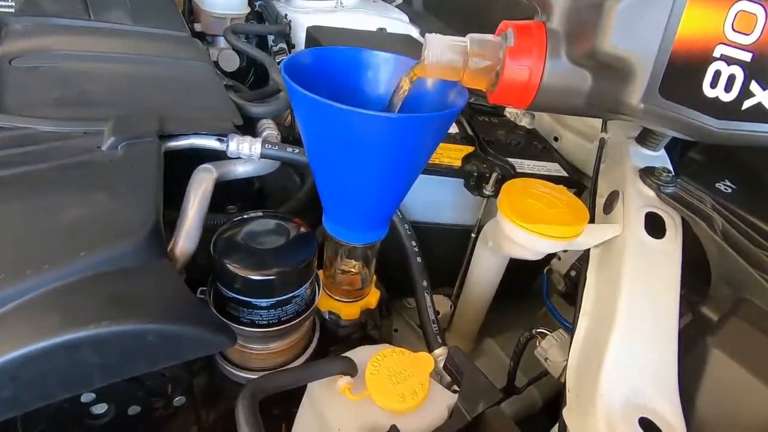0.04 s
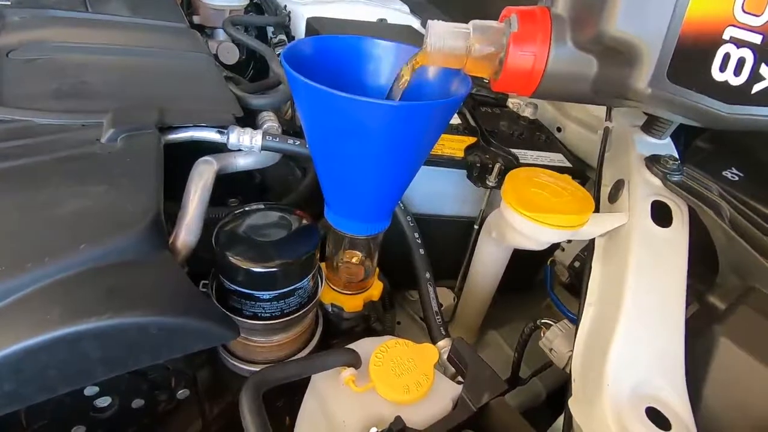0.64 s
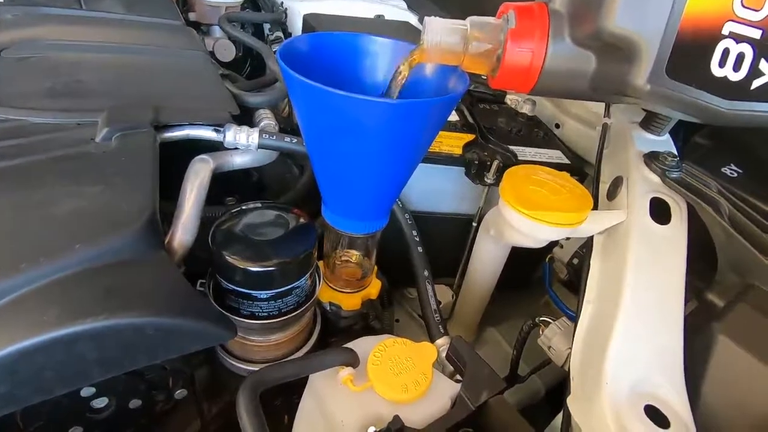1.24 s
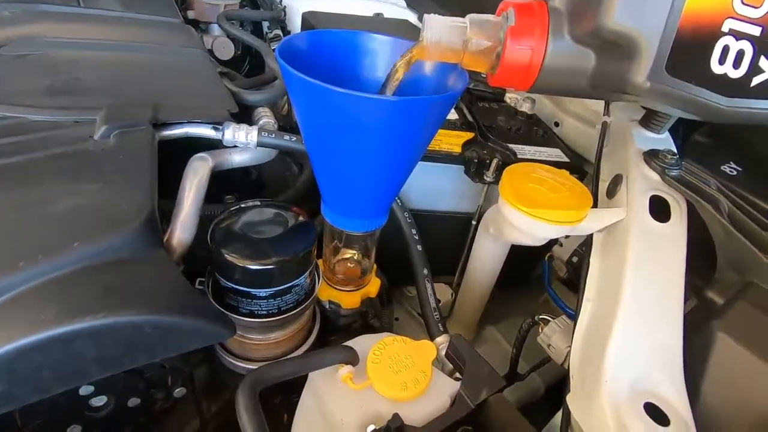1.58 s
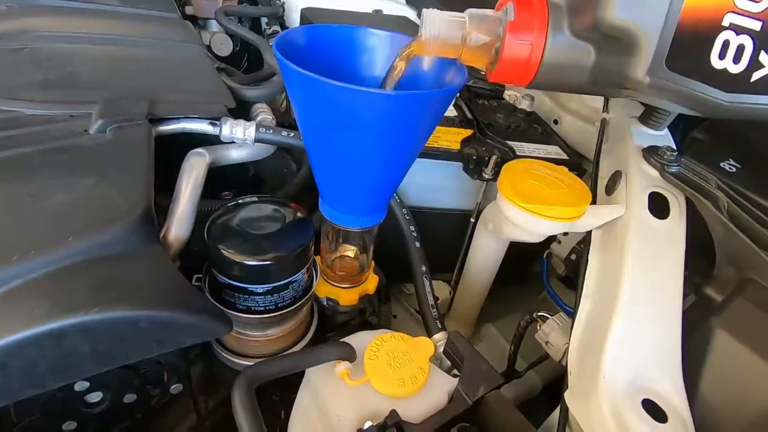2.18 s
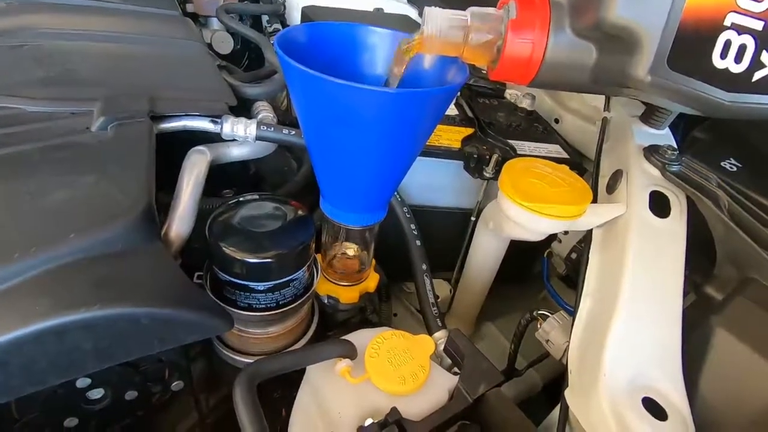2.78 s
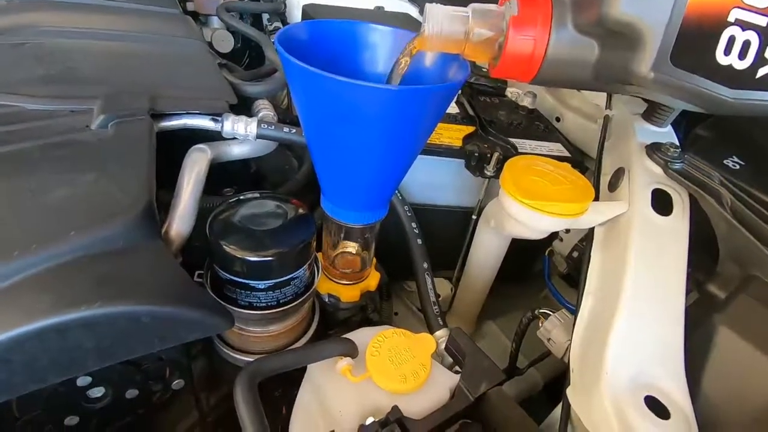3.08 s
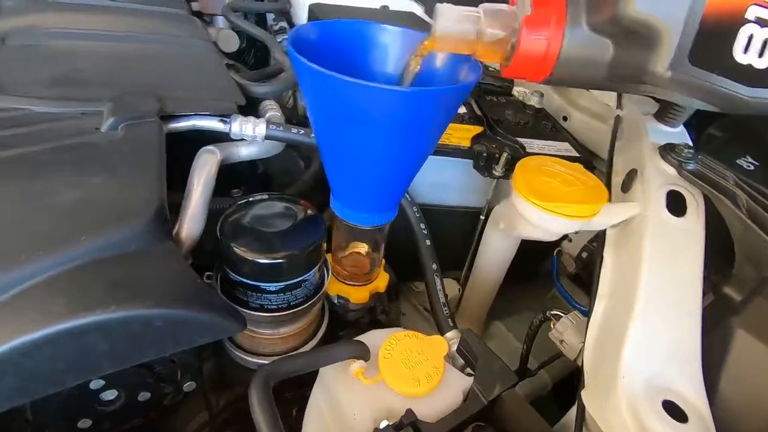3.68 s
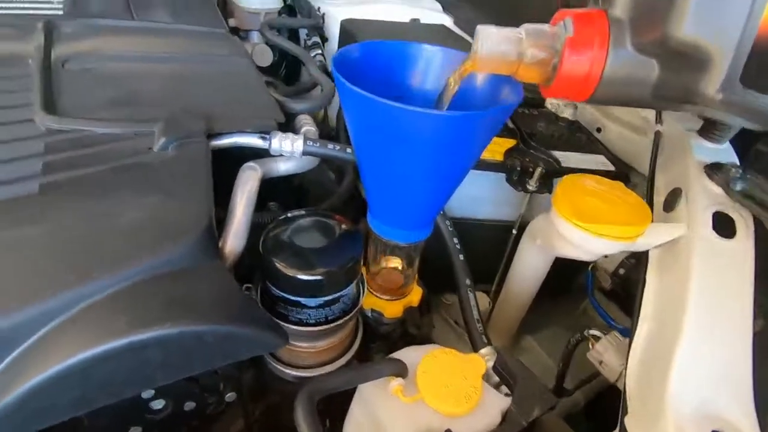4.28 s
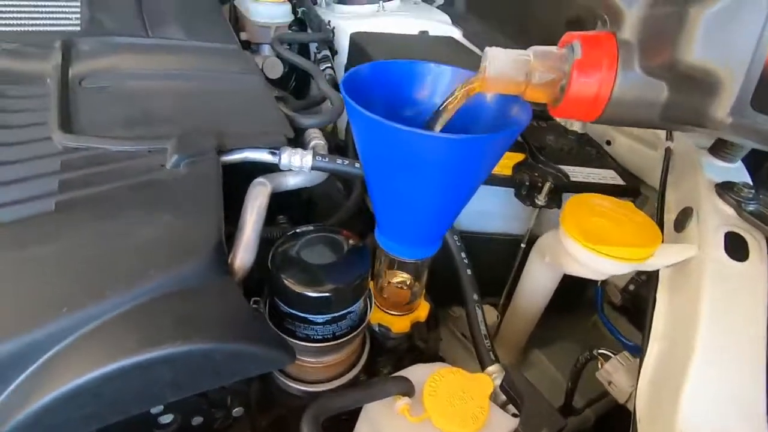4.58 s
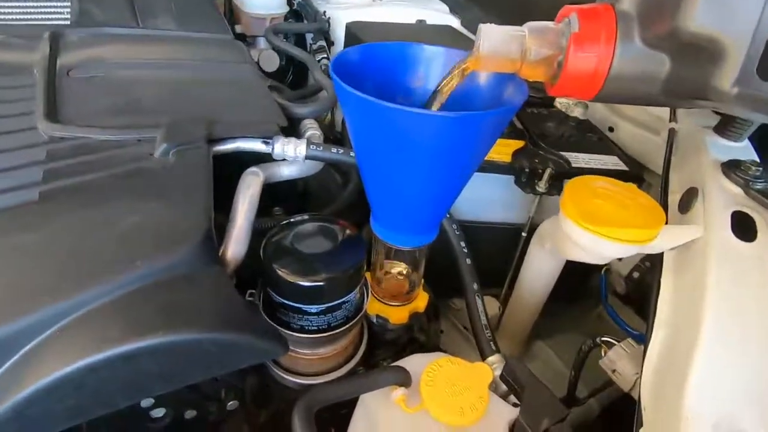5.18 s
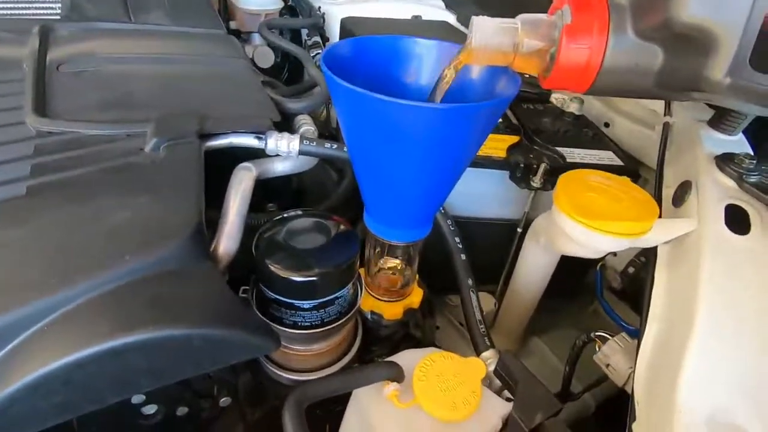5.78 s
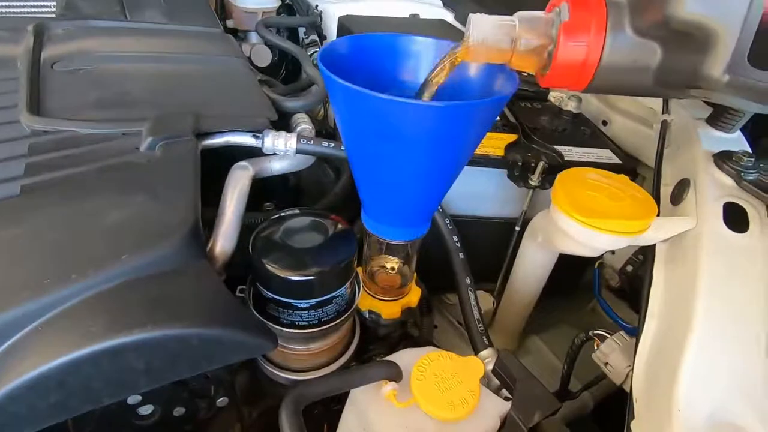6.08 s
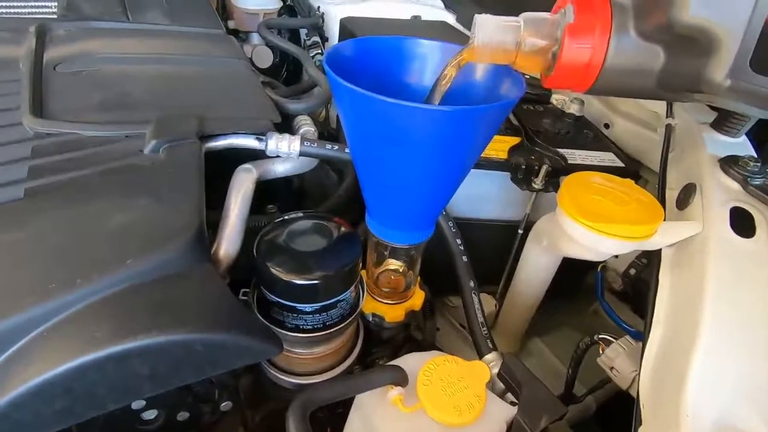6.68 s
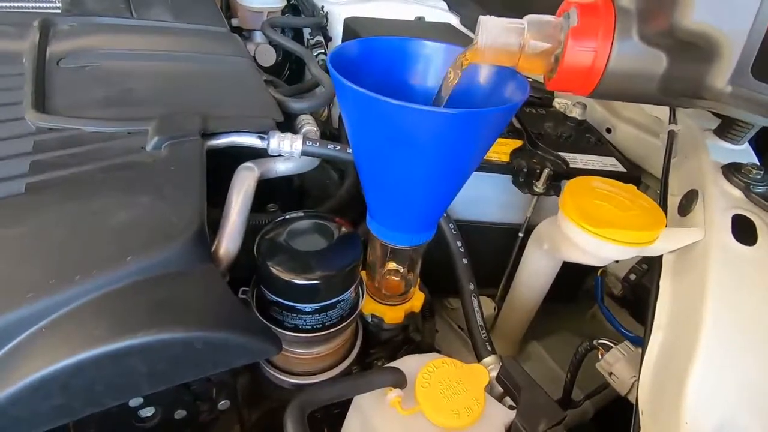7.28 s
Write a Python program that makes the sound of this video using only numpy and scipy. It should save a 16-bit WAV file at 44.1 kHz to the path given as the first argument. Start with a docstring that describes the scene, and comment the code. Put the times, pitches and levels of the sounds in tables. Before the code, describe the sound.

Close, rounded glugs repeat throughout as air gulps into a plastic bottle of oil being emptied into a funnel. Small bubble pops and light plastic clicks fall between them. About halfway there is one sharp knock on the microphone, then a quick rustle of cloth. The garage adds a slight echo, with a quiet humming fan, soft hiss and very faint insects chirping far away.

```python
"""Glug, glug: engine oil pours from a plastic bottle into a funnel, over an engine bay in a garage. About twice
a second air breaks in through the neck with a gulp, and some 80 ms later the bubble plops loose inside. Small
bubbles burst, the bottle wall ticks as it flexes, a sleeve brushes past and something knocks once on a plastic
case. Behind it all a fan hums and insects chirp far off."""
import sys
import numpy as np
from scipy import signal
from scipy.fft import rfft, irfft, next_fast_len
from scipy.io import wavfile
from scipy.ndimage import uniform_filter1d

SR = 44100
rng = np.random.default_rng(int(sys.argv[2]) if len(sys.argv) > 2 else 0)


def transcribe(signal):
    """Save signal, clipped to [-1, 1], as a 16-bit WAV file at the path in sys.argv[1]."""
    frames = np.atleast_2d(signal).T
    limited = np.clip(frames, -1, 1)
    pcm = np.round(limited * 32767).astype(np.int16)
    wavfile.write(sys.argv[1], SR, pcm)


N = 328545
TIME = np.arange(N) / SR
AGE = np.arange(SR // 6) / SR  # seconds since one short sound began


def from_db(db):
    """Turn decibels into a number to multiply by."""
    return 10 ** (np.asarray(db) / 20)


def rms_one(x):
    """Scale a sound to an average power of one."""
    return x / np.sqrt(np.mean(x ** 2) + 1e-20)


def at_hz(points, hz):
    """Look up a table at any frequency, with octaves evenly spaced."""
    f, value = np.transpose(points)
    return np.interp(np.log(np.maximum(hz, 1)), np.log(f), value)


def add(track, s, sound):
    """Mix a sound in, starting at s seconds."""
    start = max(0, round(s * SR))
    part = sound[..., :N - start]
    track[..., start:start + part.shape[-1]] += part


def place(x, pan_db, lag_s):
    """Make a sound louder on the left by pan_db and later on the right by lag_s."""
    return np.array([x * from_db(pan_db / 2), np.interp(TIME - lag_s, TIME, x) * from_db(-pan_db / 2)])


def noise(gain_at, likeness):
    """Stereo noise shaped by gain_at; likeness 1 makes both sides the same, 0 unrelated."""
    size = next_fast_len(N)
    hz = np.arange(size // 2 + 1) * SR / size
    mid, side = rfft(rng.standard_normal((2, size)))
    alike = np.clip(at_hz(likeness, hz) if np.ndim(likeness) else likeness, -1, 1)
    pair = np.sqrt(1 + alike) * mid + np.sqrt(1 - alike) * side * [[1], [-1]]
    return rms_one(irfft(pair * gain_at(hz), size)[:, :N])


def coloured(colour, likeness):
    """Noise with a tone colour: a table of how strong its lows and highs are next to each other."""
    return noise(lambda hz: from_db(at_hz(colour, hz)), likeness)


def ping(db, hz, glide, length, rise_s):
    """A short ring, as of a bubble, fading over length seconds; it slides by glide * hz each second."""
    swell = (1 - np.exp(-AGE / rise_s)) * np.exp(-(AGE / length) ** 2)
    return from_db(db) * swell * np.sin(2 * np.pi * hz * (AGE + glide * AGE ** 2 / 2))


def snaps(decay_s, rise_s, grain_db):
    """The loudness shape of a short, uneven run of tiny snaps."""
    jitter = rms_one(uniform_filter1d(rng.standard_normal(len(AGE)), size=24))
    grain = rms_one(from_db(grain_db * jitter))
    return grain * np.exp(-AGE / decay_s) * (1 - np.exp(-(AGE / rise_s) ** 2))


# how alike left and right sound in the garage: f/Hz, likeness from 0 to 1
ROOM_LIKENESS = [(25, 0.7), (60, 0.96), (300, 0.9), (550, 0), (900, 0), (1500, 0), (3300, 0.72),
                 (5500, 0.087), (12000, 0)]
def wavering_tone(centre_hz, width_hz):
    """Noise squeezed into a narrow band sounds like an unsteady tone."""
    return noise(lambda hz: 1 / (1 + (2 * (hz - centre_hz) / width_hz) ** 2), ROOM_LIKENESS)


# tone colours of the low rumble and of the hiss: f/Hz, level/dB
RUMBLE_COLOUR = [(20, -11), (55, 3.5), (100, -4), (160, -2.5), (250, -2), (350, -10), (500, -22.5),
                 (800, -17.5), (1000, -20.5), (1250, -18), (1600, -28.5), (2500, -45.5)]
HISS_COLOUR = [(900, -10), (1800, 0.5), (2600, -4), (3400, -1), (4500, -3.5), (5700, -1), (6800, -6),
               (7500, -6.5), (8700, -25), (10000, -10.5), (11000, -39.5), (14500, -70)]
# how the hiss swells and sinks: t/s, level/dB before hiss_gain_db
HISS_SWELL = [(0.0, -70), (0.18, -70), (0.8, -67), (4.07, -64.5), (4.79, -68.5), (7.2, -72)]
# hum of the fan and its motor: f/Hz, width/Hz, level/dB
FAN_TONES = [(58.3, 5.4, -72.5), (144.4, 3.6, -68.5), (297, 7.6, -65.5), (645.5, 23, -76), (1333, 15, -77)]
def background(rumble_db=-54.0, hiss_gain_db=2.0, blade_hz=295, blade_db=-59.5):
    """A low rumble, a slowly changing hiss and a humming fan whose blades add one steady tone."""
    rumble = from_db(rumble_db) * coloured(RUMBLE_COLOUR, ROOM_LIKENESS)
    hiss_db = np.interp(TIME, *np.transpose(HISS_SWELL)) + hiss_gain_db
    hiss = from_db(hiss_db) * coloured(HISS_COLOUR, ROOM_LIKENESS)
    blades = from_db(blade_db) * rms_one(np.sin(2 * np.pi * blade_hz * TIME))
    hum = sum(from_db(db) * wavering_tone(hz, width) for hz, width, db in FAN_TONES)
    return rumble + hiss + blades + hum


# the voices of two insects: f/Hz, width/Hz, level/dB before being cut into chirps
SLOW_INSECT_TONES = [(7456, 360, -71)]
FAST_INSECT_TONES = [(10210, 510, -76.5), (13850, 450, -79.5)]
def insect(tones, chirps_per_s, fullness, sweep_hz, pace_wander=0.09):
    """An insect outside chirps at a nearly even pace; each chirp rises a little in pitch."""
    drift = np.interp(TIME, np.arange(64), rng.standard_normal(64))  # a new random value each second
    turn = 2 * np.pi * np.cumsum(chirps_per_s * (1 + pace_wander * drift)) / SR
    chirp = np.sqrt(np.clip(fullness + np.cos(turn), 0, 1))  # more fullness, longer chirps
    bend = np.exp(2j * np.pi * np.cumsum(sweep_hz * np.sin(turn)) / SR)
    tone = sum(from_db(db) * wavering_tone(hz, width) for hz, width, db in tones)
    return chirp * np.real(signal.hilbert(tone, next_fast_len(N))[:, :N] * bend)


# how long the garage rings on: f/Hz, time to fade by 60 dB/s
GARAGE_FADE = [(150, 0.66), (400, 0.22), (1200, 0.48), (4000, 1), (12000, .25)]
def reverb(x, bay_db=-12, bay_fade_s=0.26, bay_soak_hz=3500, garage_db=-19, delay_s=0.015):
    """Sound bounces around the engine bay and, more faintly, around the garage."""
    t = TIME[:SR]
    scatter = coloured([(100, 0.0066), (10000, 0.0061)], [(300, 0.96), (1200, 0.73), (4000, 0.11)])
    edges_hz = np.geomspace(80, 16000, num=9)
    tail = 0
    for low, high in zip(edges_hz, edges_hz[1:]):
        band = signal.sosfilt(signal.butter(2, [low, high], "band", fs=SR, output="sos"), scatter[:, :SR])
        hz = np.sqrt(low * high)
        bay_ring_s = bay_fade_s / np.hypot(1, hz / bay_soak_hz)  # hoses and padding soak up the highs
        for db, fade_s in (bay_db, bay_ring_s), (garage_db, at_hz(GARAGE_FADE, hz)):
            decay = from_db(-60 * t / fade_s) * (t > delay_s)
            tail = tail + band * from_db(db) * decay / np.linalg.norm(decay)
    return signal.fftconvolve(x, tail, axes=1)[:, :N]


# echoes off the nearest walls: delay/s, level/dB
WALL_ECHOES = [(0.0216, -21.5), (0.047, -26)]
def wall_echo(x, dull_hz=1500):
    """The nearest walls send back late, dull copies of the sound."""
    dull = signal.sosfilt(signal.butter(2, dull_hz, fs=SR, output="sos"), x.mean(axis=0))
    return sum(from_db(db) * np.interp(TIME - delay, TIME, dull) for delay, db in WALL_ECHOES)


# strokes of the sleeve: t/s, level/dB, half length/s
SLEEVE_STROKES = [(3.936, -55, 0.027), (4.415, -38, 0.021), (4.517, -37, 0.024)]
# tone colour of rubbing cloth: f/Hz, level/dB
CLOTH_COLOUR = [(700, -6.5), (1300, 4.5), (2500, 0.5), (4000, 1), (6000, -3.5), (9800, -9.5), (11200, -14),
                (15000, -14)]
def sleeve():
    """Cloth slides briefly past."""
    stroke = sum(from_db(db) * np.exp(-((TIME - s) / length) ** 2) for s, db, length in SLEEVE_STROKES)
    return stroke * coloured(CLOTH_COLOUR, likeness=0.19)


# ticks of the bottle wall: t/s, relative click level/dB, relative ring level/dB, crease f/Hz
BOTTLE_TICKS = [(0.1132, -35, -56, 2540), (0.415, -27, -38.5, 6360), (0.7192, -42.5, -41, 2810),
                (3.466, -45, -96, 3370), (3.8363, -39, -53, 4230), (4.052, -45, -44, 3230),
                (4.3825, -33.5, -37, 3760), (5.347, -35.5, -53, 5300), (6.3674, -29.5, -66, 6850),
                (6.745, -43, -41, 2900), (7.1531, -37.5, -67, 5130), (7.3781, -28, -47, 2430)]
# tone colour of clicking plastic: f/Hz, level/dB
PLASTIC_COLOUR = [(500, 0.5), (1500, 4), (2300, 0.5), (3200, 4.5), (4700, -1.5), (5700, -22), (7000, -6),
                  (9500, -22), (11000, -41), (15000, -32)]
def bottle_ticks(click_gain_db=-2.5, crease_db=5, crease_q=7, ring_gain_db=7, ring_hz=1235):
    """The plastic wall buckles with a dry click, coloured by the crease that gives way, then rings."""
    clicks, ring = np.zeros((2, N)), np.zeros(N)
    plastic = coloured(PLASTIC_COLOUR, likeness=0.37)
    for s, db, ring_db, crease_hz in BOTTLE_TICKS:
        plastic = np.roll(plastic, len(AGE), axis=1)  # fresh noise for each click
        click = plastic[:, :len(AGE)] * snaps(decay_s=0.003, rise_s=0.0011, grain_db=7.5)
        crease = signal.lfilter(*signal.iirpeak(crease_hz, crease_q, fs=SR), click)
        crease *= np.linalg.norm(click) / np.linalg.norm(crease)
        add(clicks, s, from_db(db + click_gain_db) * (click + from_db(crease_db) * crease) / 2)
        tone = ping(ring_db + ring_gain_db, ring_hz, glide=1, length=0.0074, rise_s=0.0028)
        add(ring, s + 0.00088, tone)
    return clicks + place(ring, pan_db=2.5, lag_s=-0.00036)


KNOCK_S = 3.7792
def case_knock(click_db=-17, left_thud_db=-7):
    """A knock on a hard plastic case close by: a click, two short rings and a low thud."""
    click, ring, thud = np.zeros((3, N))
    add(click, KNOCK_S, from_db(click_db) * snaps(decay_s=0.002, rise_s=0.0005, grain_db=2))
    add(ring, KNOCK_S, ping(db=-8, hz=1260, glide=-3, length=0.0068, rise_s=0.00076))
    add(thud, KNOCK_S + 0.0024, ping(db=-19.5, hz=150, glide=-5, length=0.015, rise_s=0.0018))
    out = click * coloured(PLASTIC_COLOUR, likeness=0.18) + place(ring, pan_db=0.5, lag_s=-0.00034)
    add(out, KNOCK_S, ping(db=-17, hz=4600, glide=0, length=0.0015, rise_s=0.00056))
    return out + np.array([-from_db(left_thud_db) * thud, thud])  # pulls the left, pushes the right


def lingering_ring(db=-54, hz=1240, width_hz=110, decay_s=0.31):
    """After the knock a faint ring hangs in the air and dies away."""
    since = TIME - KNOCK_S
    return from_db(db) * (since > 0) * np.exp(-np.abs(since) / decay_s) * wavering_tone(hz, width_hz)


# tone colour of squelching oil: f/Hz, level/dB
SQUELCH_COLOUR = [(400, 3.5), (640, -0.5), (900, 3.5), (1200, 3), (1700, -1.5), (2300, -12), (3200, -16),
                  (4500, -20.5), (8000, -33), (12000, -60)]
def pops(rows, rise_s, smack_gain_db, smack_s):
    """For each row, a film of oil parts with a wet smack and the bubble behind it rings."""
    tone, smack = np.zeros((2, N))
    for s, db, hz, glide, length, smack_db in rows:
        add(tone, s, ping(db, hz, glide, length, rise_s))
        add(smack, s, from_db(smack_db + smack_gain_db) * snaps(smack_s, rise_s=0.0022, grain_db=1.5))
    return tone + smack * coloured(SQUELCH_COLOUR, likeness=0.54)


# small bubbles that stand out, and at 3.909 s a short crackle played the same way: # t/s, level/dB, f/Hz,
# length/s, relative smack level/dB
CLEAR_BUBBLES = [(0.413, -33, 1260, 0.0035, -60), (0.808, -41, 800, 0.0077, -62),
                 (1.384, -41, 830, 0.005, -59), (1.677, -44.5, 625, 0.018, -61),
                 (1.9404, -30.5, 1340, 0.0033, -50.5), (2.195, -42.5, 633, 0.018, -58.5),
                 (2.2634, -40, 603, 0.01, -59), (2.627, -38.5, 710, 0.01, -75),
                 (2.711, -43.5, 680, 0.008, -55.5), (3.286, -36.5, 810, 0.006, -50.5),
                 (3.307, -40, 584, 0.015, -77), (3.909, -43, 1144, 0.018, -45.5),
                 (4.1265, -44.5, 1010, 0.012, -68), (5.118, -44, 790, 0.0071, -58),
                 (5.33, -49.5, 630, 0.018, -78), (5.407, -48, 1090, 0.008, -59),
                 (6.242, -43.5, 870, 0.006, -59.5), (6.307, -45.5, 615, 0.025, -58),
                 (6.5332, -44, 820, 0.032, -59.5), (6.672, -43.5, 698, 0.012, -52.5),
                 (6.745, -46, 664, 0.018, -58), (7.264, -26.5, 2010, 0.007, -51.5)]
def small_bubbles(glide=3.9, faint_count=35, faint_db=-50, faint_smack_db=-66, faint_cycles=6.1):
    """Clear bubbles burst on the oil among faint random ones; the smaller, the higher and shorter."""
    rows = [(s, db, hz, glide, length, smack_db) for s, db, hz, length, smack_db in CLEAR_BUBBLES]
    for when, weakness, pitch in rng.random((faint_count, 3)):
        s = when * TIME[-1]
        hz = 580 * 2.2 ** pitch
        drop_db = 12 * weakness
        rows.append((s, faint_db - drop_db, hz, glide, faint_cycles / hz, faint_smack_db - drop_db))
    lean_left = from_db([[0.7], [-0.7]])
    return pops(rows, rise_s=0.00032, smack_gain_db=9.5, smack_s=0.011) * lean_left


# big bubbles in the bottle: t/s, level/dB, f/Hz, glide/(1/s), length/s, relative smack level/dB
BIG_BUBBLES = [(0.159, -16, 354, -24, 0.0043, -48.5), (0.778, -18, 298, 5.5, 0.016, -53),
               (1.351, -18.0, 303, 6, 0.015, -53.5), (1.932, -25.5, 316, 55, 0.0055, -52),
               (2.452, -22, 293, -17, 0.0036, -63), (2.822, -23.5, 393, 31, 0.0072, -48.5),
               (3.285, -29, 430, 25, 0.012, -47), (3.883, -19, 271, 16.5, 0.013, -73),
               (4.495, -17, 324, 2.5, 0.015, -53), (5.09, -16.5, 347, -4, 0.0066, -54.5),
               (5.632, -28, 333, -20, 0.006, -74), (6.002, -22, 324, 9, 0.0094, -72),
               (6.41, -22.5, 403, 19, 0.011, -53), (6.927, -22, 386, 42, 0.0084, -49)]
def plops(wobble_delay_s=0.01114, wobble_db=-13, wobble_pitch=1.1):
    """A big bubble pinches off inside the bottle, then wobbles once more, weaker and at a new pitch."""
    out = pops(BIG_BUBBLES, rise_s=0.001, smack_gain_db=13, smack_s=0.0064)
    for s, db, hz, *_ in BIG_BUBBLES:
        new_hz = hz * wobble_pitch * rng.uniform(0.85, 1.15)
        add(out, s + wobble_delay_s, ping(db + wobble_db, new_hz, glide=10, length=0.009, rise_s=0.0032))
    return out


# air breaks in through the neck; the next three functions each add their own gains to these levels:
# t/s, thump level/dB, thump f/Hz, air ring level/dB, snap level/dB, snap f/Hz, fizz level/dB
AIR_GULPS = [(0.086, -26, 204, -32, -35.5, 4720, -44.5), (0.695, -25, 210, -28.5, -32, 2870, -71),
             (1.271, -25.5, 207, -31, -41.5, 3630, -54.5), (1.863, -27, 216, -36.5, -34.5, 2530, -42.5),
             (2.385, -29.5, 226, -35, -30.5, 3920, -45.5), (2.74, -32.5, 218, -36, -36.5, 2500, -43.5),
             (3.216, -24, 210, -29, -38.5, 3110, -45), (3.804, -24.5, 211, -23.5, -30, 2990, -45.5),
             (4.417, -24, 212, -25, -38, 3610, -68), (5.008, -29.5, 206, -33, -37.5, 4170, -42.5),
             (5.562, -28, 225, -37.5, -44, 5370, -54), (5.916, -26, 222, -26.5, -35.5, 3840, -68),
             (6.342, -27, 248, -39.5, -42, 3700, -53), (6.852, -29, 182, -35.5, -34, 4000, -51),
             (7.353, -26.5, 221, -29, -34, 5000, -47)]
def sucks(lead_s=0.015, half_length_s=0.016, gain_db=-33, high_hz=1700, low_hz=680, width_hz=260):
    """Just before each gulp, air is sucked softly into the neck and sounds two breathy tones."""
    draw = sum(from_db(db) * np.exp(-((TIME - s + lead_s) / half_length_s) ** 2)
               for s, db, *_ in AIR_GULPS)
    breath = wavering_tone(high_hz, width_hz) + wavering_tone(low_hz, width_hz)
    return from_db(gain_db) * draw * breath[0]


# tone colour of the oil film tearing: f/Hz, level/dB
TEAR_COLOUR = [(600, 5.5), (1700, -4.5), (2400, -6), (3300, -2.5), (5000, 2.5), (6500, -9), (9500, -25),
               (11000, -44), (15000, -58)]
def film_tears(fizz_gain_db=11, snap_gain_db=7, squelch_gain_db=-23, strain_gain_db=-3,
               delay_s=0.000974, squelch_s=0.017, strain_s=0.0062, ring_q=15):
    """The oil film squelches as it is drawn thin, then tears in a fizz of snaps that ring a bubble."""
    fizz, ring, squelch = np.zeros((3, N))
    for s, thump_db, _, _, snap_db, snap_hz, fizz_db in AIR_GULPS:
        tear_s = s + delay_s
        tear = snaps(decay_s=0.0063, rise_s=0.00068, grain_db=-1.5)
        add(fizz, tear_s, from_db(fizz_db + fizz_gain_db) * tear)
        crackle = tear * rng.standard_normal(len(AGE))
        tone = signal.lfilter(*signal.iirpeak(snap_hz, ring_q, fs=SR), crackle)
        tone *= np.linalg.norm(tear) / np.linalg.norm(tone)
        add(ring, tear_s, from_db(snap_db + snap_gain_db) * tone / 2)
        time_left = tear_s - TIME[TIME < tear_s]  # squelch and fizz both swell up to the tear
        add(squelch, 0, from_db(thump_db + squelch_gain_db) * np.exp(-time_left / squelch_s))
        add(fizz, 0, from_db(fizz_db + strain_gain_db) * np.exp(-time_left / strain_s))
    return (place(ring, pan_db=1.0, lag_s=-0.00003) + fizz * coloured(TEAR_COLOUR, likeness=0.86)
            + squelch * coloured(SQUELCH_COLOUR, likeness=0.8))


# tones of the oil's thump: delay/s, relative level/dB, times the thump pitch, glide/(1/s), mean length/s
OIL_TONES = [(0.0014, 2, 1.35, -12.5, 0.0067), (0.01144, -2.5, 1.0, -4.5, 0.019),
             (0.0023, -16, 1.55, 2, 0.019), (0.0027, -14.5, 0.7, -1, 0.026), (0.046, -12.5, 0.9, -4, 0.02)]
# tones of the air in the bottle: delay/s, relative level/dB, mean f/Hz, glide/(1/s), length/s
AIR_TONES = [(0.00055, 11, 1074, 9.56, 0.0077), (0.00043, -5.5, 1650, 9.9, 0.0042),
             (0.00399, -17, 1190, 1, 0.031), (0.00036, -11.5, 601, 3.33, 0.019)]
def gulps():
    """Each rush of air thumps the body of oil and rings the air above it."""
    thump, air = np.zeros((2, N))
    for s, thump_db, thump_hz, air_db, *_ in AIR_GULPS:
        for delay, db, multiple, glide, length in OIL_TONES:
            length *= rng.uniform(0.88, 1.12)
            add(thump, s + delay, ping(thump_db + db, thump_hz * multiple, glide, length, rise_s=0.0006))
        detune = rng.uniform(0.975, 1.025)
        for delay, db, hz, glide, length in AIR_TONES:
            add(air, s + delay, ping(air_db + db, hz * detune, glide, length, rise_s=0.0023))
    return place(thump, pan_db=0.2, lag_s=0.00001) + place(air, pan_db=3.5, lag_s=-0.000091)


def scene():
    """The pour and the handling sounds close by, their echoes and the background."""
    pour = sucks() + gulps() + film_tears() + plops() + small_bubbles()
    close = pour + bottle_ticks() + sleeve() + case_knock()
    insects = (insect(SLOW_INSECT_TONES, chirps_per_s=4.4, fullness=0.62, sweep_hz=70)
               + insect(FAST_INSECT_TONES, chirps_per_s=6.3, fullness=0.12, sweep_hz=50))
    return close + reverb(close) + wall_echo(close) + lingering_ring() + background() + insects


def record(dry, dull_hz=10480, leak_db=-16.5, cutoff_hz=15600):
    """The sound is dulled above about 10.5 kHz, and the very top is cut off."""
    leak = from_db(leak_db)
    dull = signal.sosfiltfilt(signal.butter(10, dull_hz, fs=SR, output="sos"), dry)
    softened = (1 - leak) * dull + leak * dry
    return signal.sosfilt(signal.cheby2(12, 60, cutoff_hz, fs=SR, output="sos"), softened)


dry = scene()
out = record(dry)
transcribe(out)
```